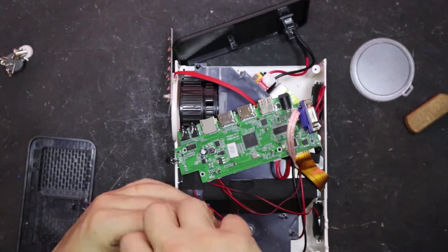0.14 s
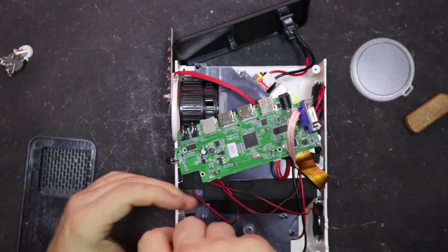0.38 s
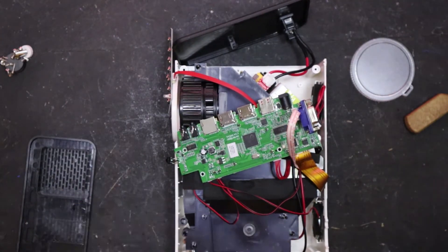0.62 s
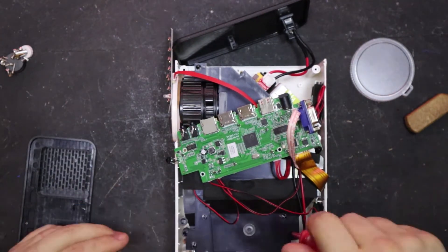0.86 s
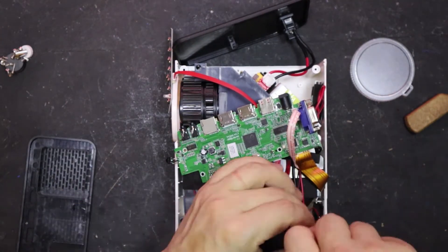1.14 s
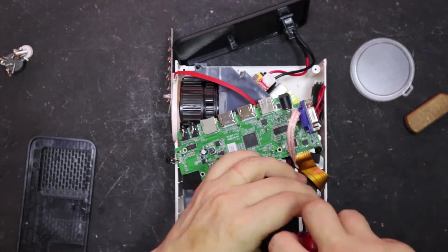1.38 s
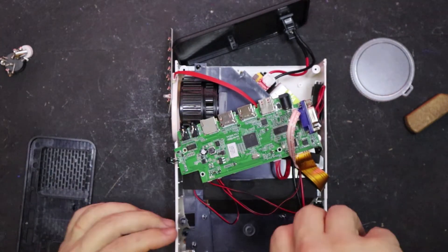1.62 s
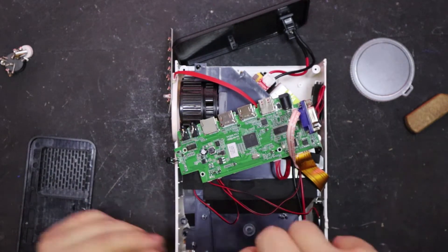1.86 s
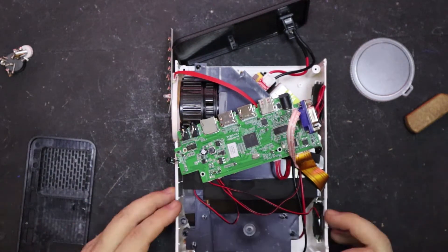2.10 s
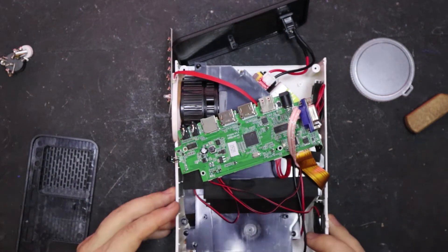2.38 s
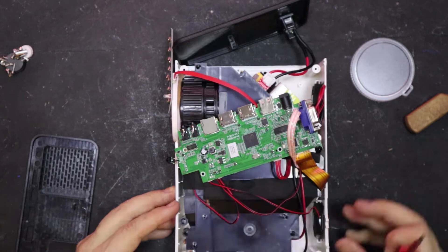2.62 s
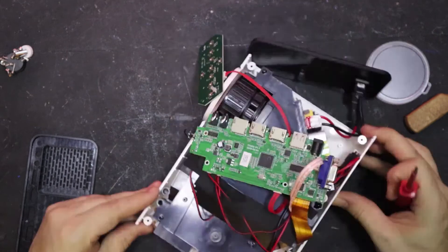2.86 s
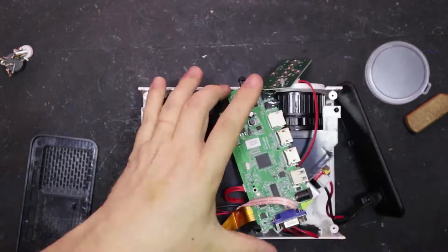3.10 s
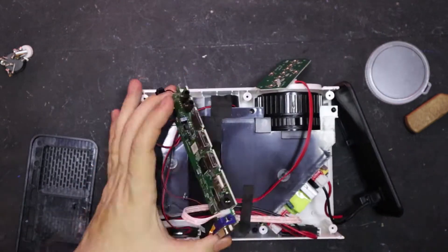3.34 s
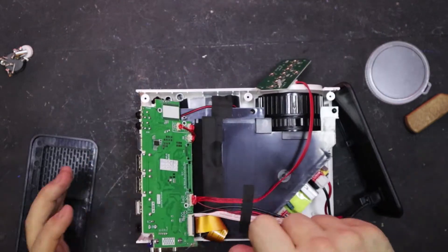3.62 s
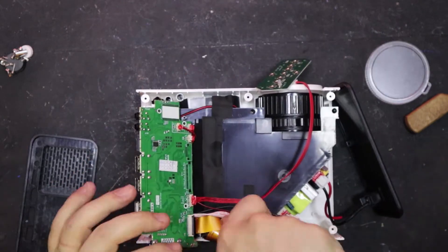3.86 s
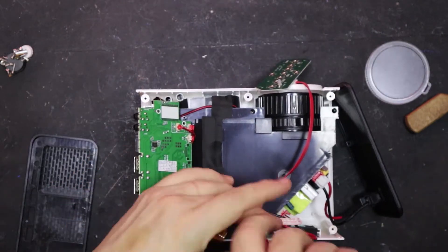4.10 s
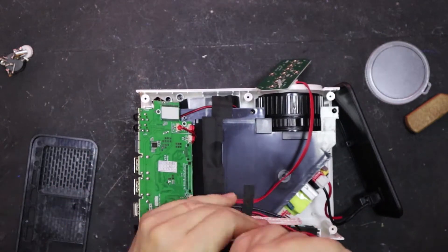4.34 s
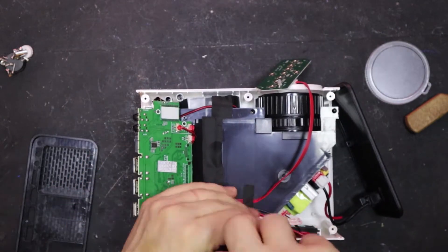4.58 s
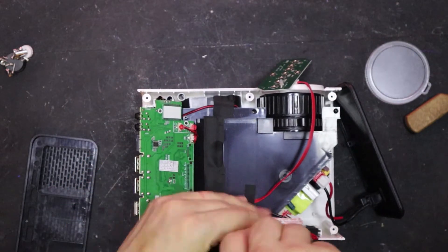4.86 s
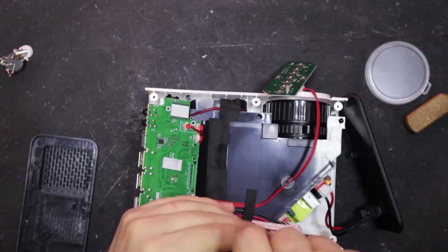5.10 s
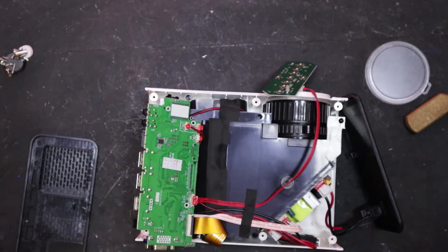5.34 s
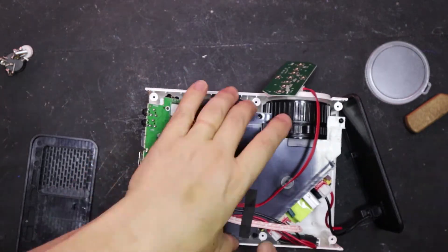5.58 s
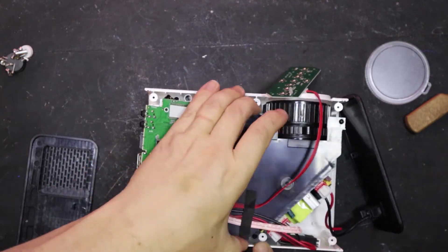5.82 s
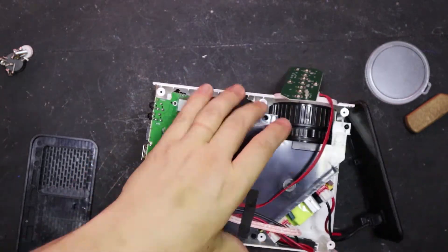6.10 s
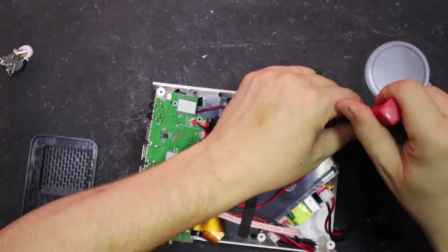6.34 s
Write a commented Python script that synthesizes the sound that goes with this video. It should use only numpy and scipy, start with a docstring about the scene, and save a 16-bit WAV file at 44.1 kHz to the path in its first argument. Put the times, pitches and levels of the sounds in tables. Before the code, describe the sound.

Close, wide stereo view of a bench in a quiet room. Hands dismantle a small plastic projector at accelerated speed: short hollow knocks and clicks, a sharp pair around one and a half seconds, then a sparse gap. The case is turned near three seconds with dense clatter, rough sliding and a heavy low thump. Lighter fiddling follows, then firmer knocks near the end. Soft hiss and faint mains hum stay underneath.

```python
"""On a bench in a quiet room, hands take a small projector apart, heard faster than life.
Knocks and ticks are short noise bursts; the knocks are coloured by the ringing plastic case.
Sliding parts and wires are uneven noise in strokes, joined by chance taps; the bench thumps and rumbles.
Steady hiss and a faint mains hum lie underneath.
The speed-up smears every knock into a short burst whose phases differ between the two ears."""
import sys
import numpy as np
from scipy import signal
from scipy.fft import rfft, irfft
from scipy.io import wavfile
from scipy.ndimage import uniform_filter1d

SR = 44100
rng = np.random.default_rng(int(sys.argv[2]) if len(sys.argv) > 2 else 0)


def to_linear_factor(level_db):
    """Convert decibel levels (scalar or array-like) to linear amplitude factors."""
    exponent = np.asarray(level_db, float) / 20
    return 10 ** exponent


def to_wav(sig):
    """Store sig (one row per channel, or 1-D mono) as 16-bit WAV at the path in sys.argv[1].

    Samples outside -1..1 are clipped; the rate is SR.
    """
    pcm = np.clip(np.atleast_2d(sig), -1, 1) * 32767
    pcm = np.round(pcm).astype(np.int16)
    wavfile.write(sys.argv[1], SR, pcm.T)  # frames by channels


N = 284445  # length of the scene in samples

# resonances of the plastic case: (frequency [Hz], width before the speed-up [Hz], level [dB])
CASE_MODES = [(608, 28, -18), (1274, 140, 5.5), (1622, 140, 2), (1730, 110, -25), (3150, 23, -8.5),
              (3360, 57, -11.5), (3730, 17, -14.5), (4600, 63, -11.5), (4840, 60, -12.5), (5370, 16, -8.5),
              (6600, 46, -18)]
# broad colour of a blow on the shell: (frequency [Hz], level [dB per Hz])
SHELL_COLOUR = [(120, -50), (200, -16), (424, -2), (659, 2), (1040, -4), (1650, -9), (5420, -20.5),
                (6880, -27), (14100, -31), (16000, -48.5)]
# how alike the two ears are: (frequency [Hz], likeness [0 to 1])
EAR_LIKENESS = [(60, 1), (130, 0.23), (350, 0.072), (800, 0.016), (16000, 0.017)]

LEAD_S = 0.06        # room in each burst before its peak
EARLY_S = 0.0015     # knocks and ticks are placed this much early; a ring peaks just after the contact
BURST_SIZE = 8192    # samples in one burst


def rms_one(x):
    """Scale a sound to rms 1."""
    return x / np.sqrt(np.mean(x ** 2) + 1e-20)


def at_hz(points, hz):
    """Read a spectrum between its points on a log-frequency axis."""
    points = np.array(points)
    return np.interp(np.log(hz + 1), np.log(points[:, 0]), points[:, 1])


def resonance(hz, centre_hz, width_hz):
    """Height of a resonance curve, 1 on top."""
    return 1 / np.sqrt(1 + (2 * (hz - centre_hz) / width_hz) ** 2)


def three_ranges(hz):
    """Overlapping weights for body (low), edge (from 2500 Hz) and tick (from 6500 Hz)."""
    below_edge, below_tick = [1 / (1 + (hz / cut_hz) ** 8) for cut_hz in (2500, 6500)]
    return np.sqrt([below_edge, np.maximum(below_tick - below_edge, 0), 1 - below_tick])


def flicker(rate_hz, depth_db):
    """Chance gain that glides between random levels."""
    levels = rng.standard_normal(int(N / SR * rate_hz) + 2)
    position = np.arange(N) / SR * rate_hz
    return to_linear_factor(depth_db * np.interp(position, np.arange(len(levels)), levels))


def two_ears(noise):
    """Spectra of two noises, mixed so that mainly the bass agrees between the ears."""
    hz = np.fft.rfftfreq(noise.shape[-1], 1 / SR)
    alike = np.clip(at_hz(EAR_LIKENESS, hz), 0, 1)
    mid, side = rfft(noise)
    return hz, (np.sqrt(1 + alike) * mid + np.sqrt(1 - alike) * side * [[1], [-1]]) / np.sqrt(2)


def case_colour(hz, strengths_db, mode_db):
    """The broad shell colour with the case resonances standing out of it."""
    shortening_hz = 90  # the speed-up shortens every ring, which widens its resonance
    heights_db = [db - at_hz(SHELL_COLOUR, mode_hz) for mode_hz, width_hz, db in CASE_MODES]
    top_db = max(heights_db)
    modes = 0
    for (mode_hz, width_hz, _), height_db, strength_db in zip(CASE_MODES, heights_db, strengths_db):
        power = to_linear_factor(2 * (height_db - top_db + strength_db))
        modes = modes + power * resonance(hz, mode_hz, width_hz + shortening_hz) ** 2
    return to_linear_factor(at_hz(SHELL_COLOUR, hz)) * np.sqrt(1 + to_linear_factor(2 * mode_db) * modes)


def smear(ms, rise=0.6):
    """A bell-shaped swell that rises faster than it falls, and the short tail from bench and walls."""
    tail_db, tail_t60_s = 1, 0.032  # T60: time to fall by 60 dB
    t = np.arange(BURST_SIZE) / SR - LEAD_S
    width_s = np.clip(ms, 2, 60) / 1000 * np.where(t < 0, rise, 2 - rise)
    swell = np.exp(-np.log(4) * (t / width_s) ** 2)
    tail = to_linear_factor(tail_db - 60 * t / tail_t60_s) * np.where(t > 0, 1 - swell, 0)
    return swell, tail


def scattered(burst):
    """Both ears get the same burst, but the speed-up turns their phases apart in changing amounts."""
    step_hz = 200.1  # spacing of the random phase turns
    hz = np.fft.rfftfreq(len(burst), 1 / SR)
    random_turns = rng.uniform(-1.3 * np.pi, 1.3 * np.pi, 200)
    turns = np.interp(hz / step_hz, np.arange(200), random_turns)
    apart = turns * (1 - np.clip(at_hz(EAR_LIKENESS, hz), 0, 1))
    return hz, rfft(burst) * np.exp(0.5j * apart * [[1], [-1]])


def causal(height):
    """Minimum-phase response of a given height: rings come after the blow, never before."""
    cepstrum = irfft(np.log(height))
    half = len(cepstrum) // 2
    fold = np.r_[1, np.full(half - 1, 2), 1, np.zeros(half - 1)]
    return np.exp(rfft(cepstrum * fold))


def shaped(burst, colour, swell):
    """Colour a burst and give each ear about rms 1 at the top of the swell."""
    x = irfft(burst * colour)
    return x * np.sqrt(np.sum(swell ** 2) / np.sum(x ** 2, axis=1, keepdims=True))


def add(out, s, burst):
    """Mix a burst in with the top of its swell at time s."""
    i = round((s - LEAD_S) * SR)
    out[:, max(i, 0):i + burst.shape[1]] += burst[:, max(-i, 0):N - i]


def room_tone():
    """Steady hiss and ventilation as coloured noise, with wavering hum tones."""
    # colour of the room air: (frequency [Hz], level [dB per Hz])
    air_colour = [(15, -31), (25, -1), (59, 0), (97, -10), (153, -6), (326, -19), (531, -16), (754, -21),
                  (988, -16), (1100, -23), (1230, -20), (1610, -25), (4490, -26), (14800, -31),
                  (16000, -36)]
    # mains hum and a faint whine: (frequency [Hz], level before a 6.5 dB lift [dB])
    hum_tones = [(50, -61.5), (150, -69), (910, -72)]
    hz, air = two_ears(rng.standard_normal((2, N)))
    bass_cut = (hz / np.hypot(hz, 60.0)) ** 2  # the small microphone loses the deepest bass
    out = to_linear_factor(-56) * rms_one(irfft(air * to_linear_factor(at_hz(air_colour, hz)) * bass_cut, N))
    for tone_hz, db in hum_tones:
        # the second ear's phase drifts away from the first
        wander = np.cumsum(rng.standard_normal((2, N)), axis=1) * tone_hz * 3e-5 * [[0], [1]]
        phase = 2 * np.pi * tone_hz * np.cumsum(flicker(4.4, depth_db=0.1)) / SR + wander
        out = out + to_linear_factor(db + 6.5) * flicker(3.5, depth_db=1.5) * np.sin(phase)
    return out


def sliding():
    """Body and edge gain of the sliding strokes: attack, steady swell, release."""
    # parts and fingers sliding, stroke by stroke:
    # (start [s], end [s], body level [dB], swell over the stroke [dB], edge re body [dB])
    strokes = [(-0.05, 0.305, -57, 9, -2), (0.306, 0.454, -47.5, 8, -3), (0.892, 0.947, -42.5, -1, -11),
               (1.04, 1.149, -53.5, -7.5, 3.5), (1.163, 1.446, -50.5, 4, -17), (1.54, 1.659, -46.5, 4, -4),
               (1.846, 1.955, -69, 1, -12), (2.048, 2.332, -52, -1, 1), (2.334, 2.647, -43.5, 14, -7.5),
               (2.713, 2.85, -35.5, -1.5, -1), (2.861, 3.088, -28.5, -3.5, -5.5),
               (3.172, 3.544, -47, 8.5, -5.5), (3.587, 3.765, -52, 9, -9), (3.818, 4.255, -52, 3.5, -6.5),
               (4.252, 5.029, -46, 0, -12), (5.026, 5.114, -37.5, 2.5, -4.5), (5.416, 5.532, -58, 0, 4.5),
               (5.587, 5.74, -51.5, -8, 3), (5.711, 5.865, -42.5, 7.5, -4.5), (5.88, 6.168, -47.5, 4, -13),
               (6.197, 6.283, -44, -9.5, 1), (6.35, 6.5, -54, 3, -15)]
    attack_s, release_s = 0.016, 0.019
    rest_db = -68.5  # faint stirring between strokes
    t = np.arange(N) / SR
    body, edge = to_linear_factor(rest_db), to_linear_factor(rest_db)
    for start, end, db, swell_db, edge_db in strokes:
        fade_in = (t - start) / attack_s
        fade_out = 1 + (end - t) / release_s
        shape = np.clip(np.minimum(fade_in, fade_out), 0, 1) ** 2
        progress = np.clip((t - start) / (end - start) - 0.5, -0.5, 0.5)
        gain = shape * to_linear_factor(db + swell_db * progress)
        body = np.hypot(body, gain)
        edge = np.hypot(edge, gain * to_linear_factor(edge_db))
    return body, edge


def rubbing():
    """Dense uneven micro-slips drive the case modes; both ears share the grain, not the phase."""
    grain = flicker(90.0, depth_db=2.5) * flicker(350.0, depth_db=3.5)  # sliding catches and lets go
    hz, slips = two_ears(rng.standard_normal((2, N)) * grain)
    colour = case_colour(hz, np.zeros(len(CASE_MODES)), mode_db=-13.0)
    body, edge = sliding()
    gains = body, edge, edge * to_linear_factor(-16)  # the tick range lies 16 dB below the edge
    out = 0
    for gain, weight in zip(gains, three_ranges(hz)):
        out = out + gain * rms_one(irfft(slips * colour * weight, N))
    return out


def rumble():
    """The bench shakes as low noise while weight shifts on it, following the sliding."""
    level_db, follows = -56, 0.55  # level for a -50 dB stroke; share of the stroke's dB swing
    hz, shake = two_ears(rng.standard_normal((2, N)) * flicker(20.0, depth_db=0.5))
    low_noise = rms_one(irfft(shake * resonance(hz, 116, 130) ** 2, N))
    swing = (sliding()[0] / to_linear_factor(-50)) ** follows
    return to_linear_factor(level_db) * uniform_filter1d(swing, size=3000) * low_noise


def strike(rows):
    """Each blow rings the case modes in new strengths, one ring boosted, with lumps for where it lands."""
    out = np.zeros((2, N))
    for s, body_db, ring_hz, edge_db, ms in rows:
        swell, tail = smear(ms)
        hz, burst = scattered(rng.standard_normal(BURST_SIZE) * np.hypot(swell, tail))
        dry_burst = scattered(rng.standard_normal(BURST_SIZE) * swell)[1]  # highest ticks have no tail
        colour = case_colour(hz, rng.normal(0, 0.99, len(CASE_MODES)), mode_db=2.5)
        colour = colour * (1 + to_linear_factor(6.0) * resonance(hz, ring_hz, 0.27 * ring_hz) ** 2)
        lumps = np.c_[np.geomspace(300, 17000, 40), rng.normal(0, 2, 40)]  # (Hz, dB)
        colour = colour * to_linear_factor(at_hz(lumps, hz))
        body, edge, tick = three_ranges(hz) * causal(colour)
        tick_db = -21 + 1.56 * max(edge_db, -8.0)  # harder blows tick more
        blow = shaped(burst, body, swell)
        blow = blow + to_linear_factor(edge_db - 5.0) * shaped(burst, edge, swell)
        blow = blow + to_linear_factor(tick_db) * shaped(dry_burst, tick, swell)
        add(out, s - EARLY_S, to_linear_factor(body_db - 1.4) * blow)
    return out


def knocks():
    """Plastic parts knock and click: each contact sets the case ringing."""
    # (peak time [s], body level before a 1.4 dB cut [dB], boosted ring [Hz],
    #  hardness: edge re body before a 5 dB cut [dB], smear [ms])
    knock_rows = [(0.004, -35, 900, -0.5, 4.3), (0.051, -44, 3900, 7, 4.5), (0.26, -44, 610, -7, 14),
                  (0.333, -42.5, 1780, 7.5, 8.3), (0.38, -15, 683, -5.5, 4.5),
                  (0.431, -24.5, 1570, 0.5, 5.8), (0.452, -35.5, 3560, 8.5, 6.6),
                  (0.7, -20.5, 1780, -19.5, 6.5), (0.913, -26, 2900, 2, 7.1), (0.928, -16, 1310, 1.5, 6.7),
                  (1.003, -43, 1430, -3, 11), (1.062, -19.5, 1040, 6, 4.6), (1.086, -35, 860, -14, 5.0),
                  (1.252, -34.5, 596, -14, 4.5), (1.288, -34, 660, -9, 6), (1.316, -29, 1050, -1.5, 9.5),
                  (1.358, -21, 1220, -6, 4.5), (1.387, -16, 1480, 8, 3.5), (1.4, -12, 497, -3, 2.5),
                  (1.491, -10, 560, 0, 3.3), (1.554, -33, 1460, -8, 4.5), (1.571, -36, 834, 0, 5.4),
                  (1.591, -28, 805, -20, 3.7), (1.637, -29, 1440, 4, 9), (1.649, -39, 5600, 17.5, 6),
                  (1.999, -21.5, 1460, -4.5, 6.7), (2.145, -42.5, 4900, 8.5, 7.8),
                  (2.263, -26.5, 470, 0.5, 8.9), (2.403, -21, 1260, -6, 8.9), (2.443, -36, 810, -4, 11.4),
                  (2.496, -29.5, 810, -3, 4.5), (2.535, -28.5, 620, -7, 6), (2.564, -25, 1800, -1.5, 11),
                  (2.617, -18.5, 630, -22, 10.3), (2.643, -10.5, 670, 0.5, 4.3), (2.74, -32, 655, -11, 10),
                  (2.794, -17, 680, 0, 19), (2.809, -11, 1680, -1, 7.3), (2.832, -18.5, 3320, 5, 5.3),
                  (2.889, -18, 700, -25, 6.8), (2.923, -23.5, 730, -10, 12), (3.008, -14, 830, -27, 5.5),
                  (3.018, -12, 1240, -3, 14), (3.048, -20.5, 684, 8, 8.7), (3.09, -23.5, 2020, 9.5, 2.9),
                  (3.194, -32, 1430, -4, 6.3), (3.235, -30.5, 750, -4, 4), (3.276, -21.5, 646, -12, 2),
                  (3.292, -16, 675, 0, 3.2), (3.334, -34, 4140, 7.5, 6.5), (3.429, -14.5, 530, -4.5, 9.8),
                  (3.525, -21.5, 5330, 6, 4.8), (3.604, -31, 1350, -1.5, 8.1), (3.65, -39.5, 1400, -4, 8.5),
                  (3.714, -20.5, 870, -9, 7.6), (3.76, -33.5, 520, -12, 5.4),
                  (3.989, -31, 3200, 10.5, 14.8), (4.04, -29, 2930, 10.5, 6.7), (4.29, -30.5, 880, -4, 4.3),
                  (4.497, -27, 650, -9, 5.4), (4.514, -32.5, 640, -1, 5.5), (4.594, -32, 660, -12, 11),
                  (4.684, -21, 570, 0, 10.3), (4.72, -29.5, 654, -3.5, 10), (4.752, -28, 880, 0.5, 7.9),
                  (4.835, -37, 570, 0, 8.3), (4.907, -39, 810, -4, 7.5), (4.966, -33, 1310, 2, 13),
                  (4.99, -33.5, 730, -1, 12.5), (5.045, -27, 840, -14, 6.4), (5.091, -11.5, 1020, 3.5, 6.6),
                  (5.438, -27.5, 880, -34, 8.8), (5.486, -31.5, 3100, 13.5, 9.8),
                  (5.747, -20.5, 620, -6, 8.3), (5.79, -23, 840, 2, 7), (5.825, -20.5, 660, -4, 5.9),
                  (5.843, -13, 1370, -6.5, 5.1), (5.895, -24, 666, 2, 7.9), (5.949, -28, 4630, 10.5, 6.8),
                  (5.993, -14, 865, -10.5, 4.6), (6.055, -19.5, 900, -3.5, 8.4),
                  (6.113, -13, 1110, -8, 4.8), (6.132, -13, 1280, -5, 2.9), (6.164, -39, 4460, 9.5, 6.6),
                  (6.354, -21, 960, -7.5, 5.6), (6.415, -30.5, 1090, -4, 15),
                  (6.429, -8.5, 900, -10.5, 2.7)]
    return strike(knock_rows)


def taps(count=110):
    """Parts bump lightly at chance moments, the more strongly they are sliding."""
    # levels and hardness are in dB before the cuts that strike() makes
    above_sliding_db, spread_db, top_db = 5, 6, -25
    low_hz, high_hz = 510, 1400  # range of the boosted ring
    hardness_db, hardness_spread_db = -6, 7.5
    short_ms, long_ms = 3.7, 13  # range of the smear
    when, pitch, length = rng.random((count, 3)).T
    strength, hard = np.clip(rng.standard_normal((count, 2)).T, -2, 1)
    sliding_db = 20 * np.log10(sliding()[0][(when * N).astype(int)])
    db = np.minimum(sliding_db + above_sliding_db + spread_db * strength, top_db)
    ring_hz = low_hz * (high_hz / low_hz) ** pitch ** 2
    edge_db = hardness_db + hardness_spread_db * hard
    ms = short_ms * (long_ms / short_ms) ** length
    return strike(np.c_[when * N / SR, db, ring_hz, edge_db, ms])


def thumps():
    """The bench top answers a push with one low, damped ring."""
    # pushes into the bench top: (peak time [s], level before a 1 dB lift [dB], ring [Hz], smear [ms])
    pushes = [(0.383, -40.5, 180, 8.9), (0.698, -37, 230, 6.1), (0.935, -33, 67.6, 4.2),
              (1.324, -42, 60, 21), (1.393, -44.5, 118, 44), (1.492, -44, 60, 16), (2.269, -50, 98, 38),
              (2.409, -43, 116, 9.9), (2.651, -31, 94, 6.6), (2.738, -33, 227, 16), (2.802, -33.5, 188, 36),
              (3.035, -23, 65.6, 27.4), (3.439, -49, 109, 35), (3.716, -26, 106, 5), (3.759, -40, 117, 10),
              (4.293, -42, 118, 24), (4.464, -45, 70, 29), (4.564, -33, 96, 5.6), (4.687, -35.5, 92, 19),
              (4.756, -30.5, 123, 12), (4.851, -40.5, 80, 24), (4.936, -34, 64, 9.4), (4.99, -33, 115, 14),
              (5.095, -27, 112, 16), (5.75, -40, 99, 8.2), (5.901, -44.5, 61, 16), (6.056, -41, 107, 40),
              (6.132, -38, 60.4, 18), (6.438, -37, 123, 12)]
    out = np.zeros((2, N))
    for s, db, ring_hz, ms in pushes:
        swell = smear(ms, rise=0.92)[0]
        hz, burst = scattered(rng.standard_normal(BURST_SIZE) * swell)
        bass_cut = (hz / np.hypot(hz, 55.0)) ** 2
        panel = resonance(hz, ring_hz, 1.08 * ring_hz) ** 2 * bass_cut
        add(out, s, to_linear_factor(db + 1.0) * shaped(burst, panel, swell))
    return out


def ticks():
    """A hard thin contact makes a burst of treble only, with no tail."""
    # thin ticks, probably the screwdriver tip or a connector: (peak time [s], level [dB], smear [ms])
    contacts = [(0.702, -31, 4.6), (1.65, -33.5, 3.3), (2, -30.5, 4.3), (2.8, -34, 11), (3.43, -34, 7.1),
                (3.525, -24.5, 3.9), (3.989, -29.5, 8.7), (4.04, -32, 3.7), (5.065, -40, 3.9),
                (5.437, -43, 7.6), (5.485, -30.5, 9.5), (5.723, -35, 4.9), (5.895, -32.5, 6),
                (5.949, -21, 4.1), (6.165, -33, 5.3)]
    out = np.zeros((2, N))
    for s, db, ms in contacts:
        swell = smear(ms)[0]
        hz, burst = scattered(rng.standard_normal(BURST_SIZE) * swell)
        treble = three_ranges(hz)[2] * to_linear_factor(at_hz(SHELL_COLOUR, hz)) * resonance(hz, 16000, 9000)
        add(out, s - EARLY_S, to_linear_factor(db) * shaped(burst, treble, swell))
    return out


def scene():
    """All sources on the bench plus the room."""
    return room_tone() + rubbing() + rumble() + knocks() + taps() + thumps() + ticks()


def band_limit(x):
    """A steep low-pass at the top of the band."""
    return signal.sosfilt(signal.butter(12, 16810, fs=SR, output="sos"), x)


def record(dry):
    """Send the finished mix through band_limit()."""
    return band_limit(dry)


dry = scene()
out = record(dry)
to_wav(out)
```